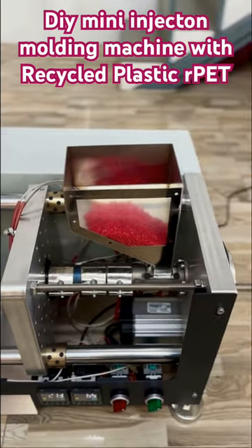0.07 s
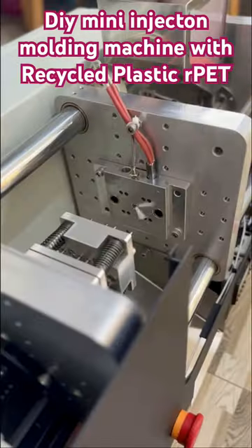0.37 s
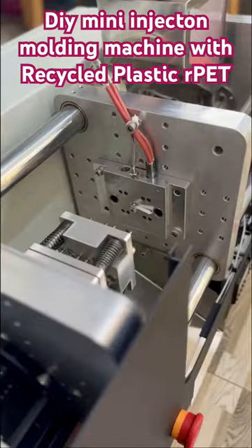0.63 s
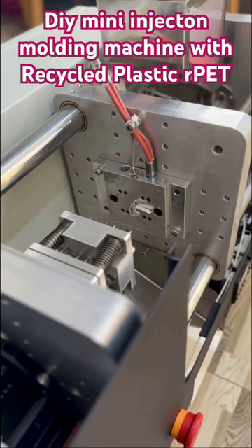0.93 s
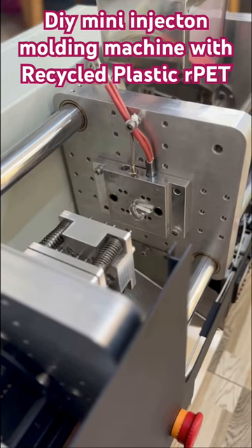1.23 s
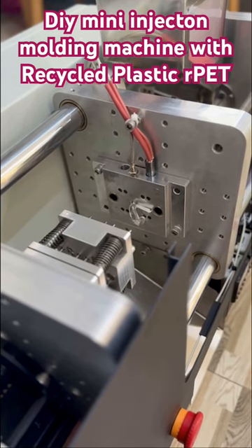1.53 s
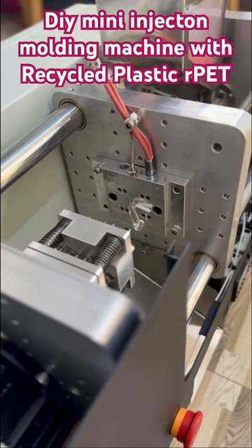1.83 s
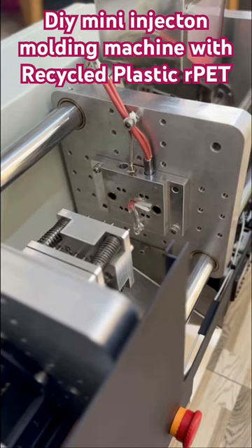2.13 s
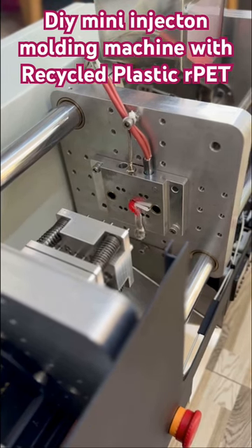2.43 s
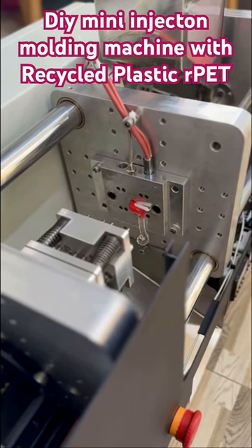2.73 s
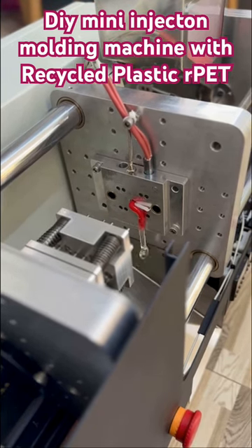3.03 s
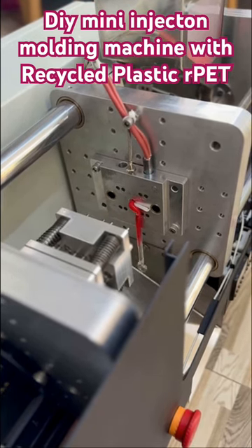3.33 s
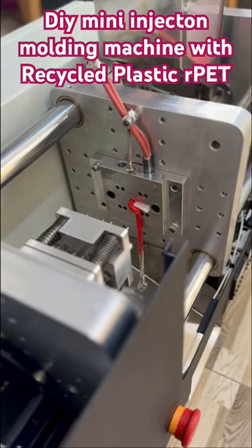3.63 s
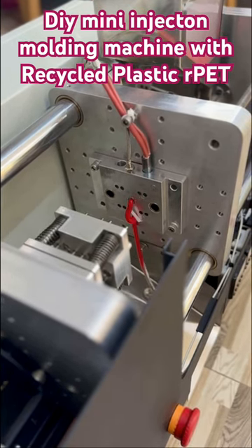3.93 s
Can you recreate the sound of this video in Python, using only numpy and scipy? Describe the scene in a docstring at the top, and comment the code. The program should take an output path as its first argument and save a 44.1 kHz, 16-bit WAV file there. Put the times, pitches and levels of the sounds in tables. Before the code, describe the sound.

A small injection moulding machine hums faintly indoors, then at 0.3 seconds jumps close and louder, with motor whirr, fan noise and a thin whine. A bright steel clink comes at 1 second as a quick, low throb builds. Light knocks, ticks and soft scuffs are scattered throughout. A brief scrape at 2.5 seconds leads to one hard metal clack at 2.9, and the machine runs on until about 4.

```python
"""Indoors, beside a small running injection moulding machine. We start a step away, then jump up close
to the nozzle: mains hum, a whirring motor, a thin whine, a shaking housing, a throb at every turn of
the drive, and fan noise. The loaded mechanism ticks and knocks in its steel frame. Sliding parts scuff
and scrape once, and steel meets steel in one bright clink and one hard clack. Each hit is a dying burst
of noise over ringing modes, with a room tail behind it."""
import sys
import numpy as np
from scipy import signal
from scipy.fft import rfft, irfft
from scipy.io import wavfile

SR = 44100
rng = np.random.default_rng(int(sys.argv[2]) if len(sys.argv) > 2 else 0)


def unload_wav(signal):
    """Save mono or channel-first audio to the path in sys.argv[1] as 16-bit WAV at rate SR, clipped to [-1, 1]."""
    wavfile.write(
        sys.argv[1],
        SR,
        np.round(np.clip(np.atleast_2d(signal).T, -1, 1) * 32767).astype(np.int16),
    )


N = 176400

# The stereo image. Each row: frequency in Hz, correlation of left and right from 0 to 1.
STEREO_LIKENESS = [(120, 1), (450, .985), (830, .8), (1850, .9), (2800, .8), (3900, .3), (4900, .7),
                   (5450, .2), (6200, .9), (10000, .7), (11700, 1)]
# Each row: frequency in Hz, phase lead of the left side in radians.
STEREO_LEAD = [(434, 0.074), (750, 0.74), (1900, 0.1), (2540, 1.74), (2740, 0.99), (3700, 2.1), (4500, 2.1),
               (5250, 2.9), (5700, 5.9), (8000, 5.75), (10300, 4.26), (11600, 3.14)]
# Each row: frequency in Hz, left minus right in dB.
STEREO_BALANCE = [(434, -0.8), (620, -2.1), (1300, -0.13)]
# Air and bearing noise from a step away. Each row: frequency in Hz, relative level in dB.
FAR_EQ = [(30,-25), (62,-10.5), (185,-25), (270,-15.5), (500,-22.5), (1000,-28.5), (2000,-42), (2750,-29),
          (3600,-43), (9000,-51.5), (12500,-59)]
# Tones that carry that far. Each row: pitch in Hz, level in dB.
FAR_TONES = [(303, -62), (607.2, -61)]
# Mains hum and fan tones up close, mains first. Each row: pitch in Hz, level in dB.
HUM_TONES = [(100.1, -36), (118.2, -44), (607.2, -43.5), (724.1, -62)]
# The motor's harmonics. Each row: multiple of its base pitch, level in dB before the fader.
MOTOR_ORDERS = [(1, -48.5), (2, -37), (3, -51)]
# The motor's fader. Each row: time in seconds, gain in dB.
MOTOR_FADER = [(.33, -2), (.7, 0.5), (1.6, .5), (2.5, 1), (3.05, -0.5), (3.7, -1)]
# The drive's thin whine. Each row: pitch in Hz, level at mid-run in dB.
WHINE_TONES = [(2586.9, -51), (2722.4, -50), (2780.4, -53.5), (6675, -68), (10567, -63.5)]
# The housing's resonances. Each row: centre in Hz, width in Hz, level in dB.
HOUSING_BANDS = [(63.4, 16, -50.5), (134, 39, -48.5), (183, 22, -51), (221.5, 6.4, -48.5), (268.5, 13, -54),
                 (314, 24, -49.5), (367.7, 9.7, -49), (400.5, 9.7, -46), (431.8, 12, -45), (652, 22, -54.5),
                 (792, 44, -54), (929, 12, -59.5), (1287, 28, -62.5), (2848, 270, -52)]
# The throb's resonances. Each row: centre in Hz, width in Hz, level in dB before swell and fader.
THROB_BANDS = [(165, 23, -56), (207.5, 15.6, -37.5), (257.6, 5.2, -47), (353, 72, -47), (410, 18, -42.5),
               (636, 63, -42.5)]
# The throb's fader. Each row: time in seconds, gain in dB.
THROB_FADER = [(.5, -14), (1, -5.5), (1.38, 4), (1.8, -1.5), (2.05, 2), (2.27, -4), (2.7, 5), (3.35, 0.5),
               (3.7, 0)]
# Air and bearing noise up close. Each row: frequency in Hz, relative level in dB.
AIR_EQ = [(30,-25.5), (100,-8.5), (300,-14), (480,-12.5), (720,-18.5), (1100,-18.5), (1600,-21.5),
          (2150,-25.5), (2800,-25.5), (4600,-34), (6800,-33.5), (10500,-35.5), (12000,-40.5)]
# The room's decay. Each row: frequency in Hz, seconds to fall 60 dB.
ROOM_T60 = [(150, 0.96), (700, 0.6), (7500, 0.41), (14000, 0.21)]
# Cues for the light knocks. Each row: start in seconds, body gain in dB, tick gain in dB.
KNOCK_CUES = [(.702, -39, -64), (1.324, -37, -39.5), (1.765, -44.5, -41.5), (2.021, -34, -48),
              (2.067, -33.5, -46), (2.234, -30.5, -41), (2.674, -26.5, -41.5), (2.727, -35, -40),
              (3.109, -39.5, -41.5), (3.591, -37.5, -46), (3.625, -38.5, -45.5), (3.778, -35.5, -44)]
# The noise colour of each kind of hit. Each row: frequency in Hz, relative level in dB.
KNOCK_EQ = [(350, -1), (600, -2.5), (880, -13), (1050, -9), (1750, -8.5), (2200, -17.5), (2800, -4.5),
            (4900, -23), (10500, -26), (12300, -42)]
CLINK_EQ = [(400, -14), (950, -3.5), (1800, -4), (2200, -16), (2700, 0), (4200, -9), (8000, -2),
            (12500, -3), (15000, -2.5)]
CLACK_EQ = [(150, -13), (340, -20), (520, -4), (740, 2), (950, -0.5), (1220, -2.5), (1700, -2),
            (2200, -9.5), (2850, -6), (4000, -15.5), (7300, -15.5), (9500, -13.5), (12500, -15),
            (14500, -8)]
# The frame's ring. Each row: pitch in Hz, level in dB relative to the knock, seconds to fall 60 dB.
FRAME_MODES = [(1036, -12, 0.31), (1280, -12, 0.15), (1525, -8, 0.09), (1637, -6, 0.096),
               (1860, -6.5, 0.095), (3350, -12.5, 0.17)]
# The quick contacts within the clink and the clack. Each row: start in seconds, gain in dB.
CLINK_HITS = [(1.0142, -21.5), (1.0215, -21), (1.0265, -31)]
CLACK_HITS = [(2.8937, -13), (2.8995, -18)]
# The ring of the struck steel. Each row: pitch in Hz, level in dB, seconds to fall 60 dB.
CLINK_MODES = [(1028, -39.5, 0.47), (1550, -38, 0.12), (1590, -39, 0.098), (2555, -34, 0.23),
               (3210, -35, 0.3), (6800, -40, 0.34), (7170, -39, .22)]
CLACK_MODES = [(337, -25, 0.25), (737, -25.5, 0.2), (927, -30, 0.19), (1247, -25, 0.12), (1545, -32, 0.065),
               (1603, -20, 0.08), (2870, -27.5, 0.096)]
# Cues for the scuffs and the one scrape. Each row: start in seconds, length in seconds, level in dB.
SCUFF_CUES = [(1.33, 0.073, -46.5), (2.037, .04, -42.5), (2.206, 0.032, -44), (2.625, .085, -44.5)]
SCRAPE_CUE = (2.503, 0.19, -32)
# The noise colour of those rubs. Each row: frequency in Hz, relative level in dB.
SCUFF_EQ = [(1500, -17), (3200, 0), (8500, -5), (15500, -9)]
SCRAPE_EQ = [(250, -7), (750, 0), (1700, -3), (2100, -7.5), (2800, -10.5), (3600, -20), (12000, -70)]

TIME = np.arange(N) / SR


def amp(db):
    """Decibels to gain."""
    return 10 ** (np.asarray(db) / 20)


def unit_rms(x):
    """Scales to rms 1."""
    return x / np.sqrt(np.mean(x ** 2) + 1e-20)


def curve(points, hz):
    """Reads a table on a log-frequency axis."""
    f, value = np.transpose(points)
    return np.interp(np.log(hz + 1), np.log(f + 1), value)


def eq(points):
    """Turns an EQ table into a colour: gain as a function of frequency."""
    return lambda hz: amp(curve(points, hz))


def fader(points):
    """A gain ride through points of time and dB."""
    return amp(np.interp(TIME, *np.transpose(points)))


def add(mix, start, sound):
    """Drops a stereo sound into the mix, start in seconds."""
    part = mix[:, round(start * SR):][:, :sound.shape[1]]
    part += sound[:, :part.shape[1]]


def drift(rate_hz):
    """A random wobble of rms 1, mostly slower than rate_hz."""
    hz = np.fft.rfftfreq(N, 1 / SR)
    return unit_rms(irfft(rfft(rng.standard_normal(N)) / (1 + (hz / rate_hz) ** 4), N))


def pan(hz):
    """Left and right gain and phase, as complex numbers."""
    left = amp(curve(STEREO_BALANCE, hz) / 2) * np.exp(.5j * curve(STEREO_LEAD, hz))
    return np.array([left, 1 / left])


def noise(colour, size=N, likeness=1):
    """Coloured stereo noise of rms 1; likeness under 1 widens it."""
    hz = np.fft.rfftfreq(size, 1 / SR)
    left, spread = np.exp(2j * np.pi * rng.random((2, len(hz))))
    shared = np.clip(likeness * curve(STEREO_LIKENESS, hz), 0, 1)
    right = shared * left + np.sqrt(1 - shared ** 2) * spread
    return unit_rms(irfft(np.array([left, right]) * pan(hz) * colour(hz), size))


def sine(hz, cycles):
    """A sine that follows a running cycle count, panned by its pitch."""
    return np.sqrt(2) * (pan(hz)[:, None] * np.exp(2j * np.pi * (cycles + rng.random()))).real


def drone(table, waver, wander):
    """Held tones that waver in level and wander slightly in pitch."""
    clock = np.cumsum(1 + wander * drift(3.6)) / SR
    return sum(amp(db) * (1 + waver * drift(14.6)) * sine(hz, hz * clock) for hz, db in table)


def far_machine(hum_db=-56, air_db=-57):
    """From a step away: faint mains hum and two tones in a dull wash of air."""
    mains = (HUM_TONES[0][0], hum_db)
    return drone([mains] + FAR_TONES, waver=0.11, wander=0.0023) + amp(air_db) * noise(eq(FAR_EQ))


def hum():
    """Mains hum and fan tones, almost dead steady."""
    return drone(HUM_TONES, waver=0.049, wander=0.00048)


def motor(base_hz=217.0, waver=0.13, wander=0.0019):
    """The drive motor's whirr: three harmonics that flutter with its speed and load."""
    cycles = np.cumsum(base_hz * (1 + wander * drift(6.2))) / SR
    whirr = sum(amp(db) * (1 + waver * drift(5.2)) * sine(order * base_hz, order * cycles)
                for order, db in MOTOR_ORDERS)
    return fader(MOTOR_FADER) * whirr


def whine(rise_db_per_s=1.43):
    """The drive's thin whine creeps up in level as the run goes on."""
    rise = amp(rise_db_per_s * (TIME - N / SR / 2))
    return rise * drone(WHINE_TONES, waver=0.24, wander=0.00026)


def panels(bands):
    """Shaken panels: noise through a set of resonances."""
    def colour(f):
        return np.sqrt(sum(amp(db) ** 2 / width / (1 + 2 * ((f - hz) / width) ** 2) ** 2
                           for hz, width, db in bands))
    level = np.sqrt(sum(amp(db) ** 2 for _, _, db in bands))
    return level * noise(colour)


def housing(flutter_db=0.24):
    """The housing rumbles as the running motor shakes it unevenly."""
    return panels(HOUSING_BANDS) * amp(flutter_db * drift(38))


def throb(turn_s=.2212, peak_at_s=2.490, sharpness=1.37):
    """The drive labours once in every turn, and a low rumble swells with it."""
    swell = np.exp(sharpness * (np.cos(2 * np.pi * (TIME - peak_at_s) / turn_s) - 1))
    return swell * fader(THROB_FADER) * panels(THROB_BANDS)


def air(level_db=-40, flutter_db=0.8, ripple_db=2.5, ripple_hz=45):
    """Fan and bearing noise, combed by the many narrow resonances of the steel enclosure."""
    grid_hz = np.arange(0, SR / 2, 10)
    smoothing = np.exp(-grid_hz[1] / ripple_hz)
    ripple = ripple_db * unit_rms(signal.lfilter([1], [1, -smoothing], rng.standard_normal(len(grid_hz))))
    level = amp(level_db + flutter_db * drift(9.1))
    return level * noise(lambda f: amp(curve(AIR_EQ, f) + np.interp(f, grid_hz, ripple)))


def contact(colour, t60, tail_db, rise_s=0.00037, treble_hz=9000, likeness=1, tail_top_hz=10800):
    """One hit: a dense rattle of the frame whose treble dies first, then the room's duller tail."""
    size = SR // 2
    def burst(decay_s, likeness):
        hz, t, spectrum = signal.stft(noise(colour, size, likeness), SR, nperseg=128)
        fade = amp(-60 * t / decay_s(hz)[:, None])
        return signal.istft(spectrum * fade, SR, nperseg=128)[1][:, :size]
    rattle = burst(lambda f: t60 / np.hypot(1, f / treble_hz), likeness)
    room = burst(lambda f: curve(ROOM_T60, f), 1)
    tail = signal.sosfilt(signal.butter(5, tail_top_hz, fs=SR, output="sos"), room)
    attack = np.minimum(np.arange(size) / SR / rise_s, 1)
    return attack * (rattle + amp(tail_db) * tail)


def ring(modes, scatter_db=0):
    """Steel modes die away after a hit; scatter varies their levels from hit to hit."""
    t = np.arange(SR // 2) / SR
    attack = np.minimum(t / 0.0015, 1)
    return attack * sum(amp(db + scatter_db * rng.standard_normal() - 60 * t / t60) * sine(hz, hz * t)
                        for hz, db, t60 in modes)


def knocks(crossover_hz=4200, t60=0.12, tail_db=-7):
    """The mechanism knocks lightly in its frame, each time with its own blend of body and bright tick."""
    def lows(f):
        return 1 / (1 + (f / crossover_hz) ** 8)
    def body_colour(f):
        return eq(KNOCK_EQ)(f) * lows(f) * f / np.hypot(f, 400)  # low cut at 400 Hz
    def tick_colour(f):
        return eq(KNOCK_EQ)(f) * (1 - lows(f))
    mix = np.zeros((2, N))
    for start, body_db, tick_db in KNOCK_CUES:
        body = contact(body_colour, t60, tail_db, rise_s=0.0035) + ring(FRAME_MODES, scatter_db=4.0)
        tick = contact(tick_colour, t60, tail_db, rise_s=0.0028)
        add(mix, start, amp(body_db) * body + amp(tick_db) * tick)
    return mix


def snap(hit_db, trim_db=-10, low_cut_hz=10000, t60=0.024):
    """The thin, bright crack of a first contact, dead centre."""
    t = np.arange(SR // 10) / SR
    low_cut = signal.butter(4, low_cut_hz, "high", fs=SR, output="sos")
    crack = unit_rms(signal.sosfilt(low_cut, rng.standard_normal(len(t))))
    return np.tile(amp(hit_db + trim_db - 60 * t / t60) * crack, (2, 1))


def steel_strike(hits, eq_points, modes, t60, tail_db, treble_hz):
    """A clink or clack: steel parts meet in a few quick contacts; the first cracks and rings on."""
    mix = np.zeros((2, N))
    for start, db in hits:
        add(mix, start, amp(db) * contact(eq(eq_points), t60, tail_db, treble_hz=treble_hz, likeness=0.97))
    first_s, first_db = hits[0]
    add(mix, first_s, snap(first_db))
    add(mix, first_s, ring(modes))
    return mix


def scuffs(grain_db=3.0):
    """Soft, bright rubs of sliding steel, often just before a knock."""
    swell = sum(amp(db) * abs(np.sin(np.pi * np.clip((TIME - start) / length, 0, 1)))
                for start, length, db in SCUFF_CUES)
    return swell * amp(grain_db * drift(200)) * noise(eq(SCUFF_EQ))


def scrape(grain_db=2, skew=0.42):
    """One brief, grainy rub that bites quickly and eases off."""
    start, length, db = SCRAPE_CUE
    progress = np.clip((TIME - start) / length, 0, 1)
    swell = abs(np.sin(np.pi * progress ** skew))
    return swell * amp(db + grain_db * drift(150)) * noise(eq(SCRAPE_EQ))


def scene(jump_s=.313):
    """The machine's bed jumps from far to close, with the hits and rubs laid on top."""
    near = hum() + motor() + whine() + housing() + throb() + air()
    crossfade = np.clip((TIME - jump_s) / .002, 0, 1)
    bed = crossfade * near + (1 - crossfade) * far_machine()
    clink = steel_strike(CLINK_HITS, CLINK_EQ, CLINK_MODES, t60=0.089, tail_db=-5.0, treble_hz=14000)
    clack = steel_strike(CLACK_HITS, CLACK_EQ, CLACK_MODES, t60=0.066, tail_db=-11.0, treble_hz=3850)
    return bed + knocks() + clink + scuffs() + scrape() + clack


def record(dry, ceiling=0.66, high_cut_hz=15900):
    """A soft clip rounds off the hardest peaks, then a steep high cut trims the top."""
    rounded = dry / (1 + (dry / ceiling) ** 4) ** (1 / 4)
    high_cut = signal.firwin(511, high_cut_hz, window=("kaiser", 9), fs=SR)
    return signal.oaconvolve(rounded, high_cut[None], "same")


dry = scene()
out = record(dry)
unload_wav(out)
```